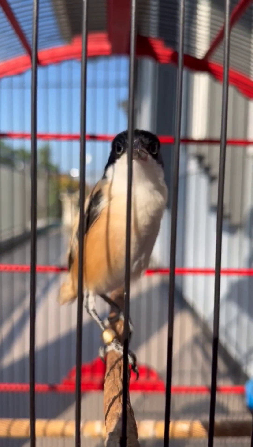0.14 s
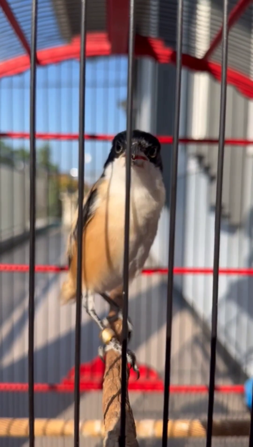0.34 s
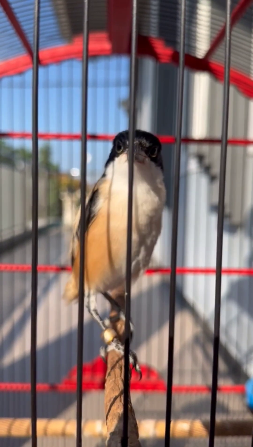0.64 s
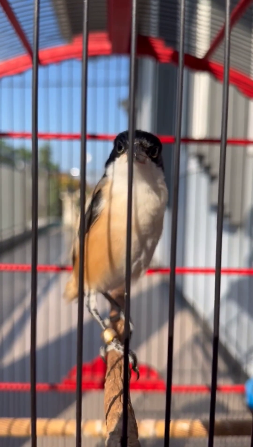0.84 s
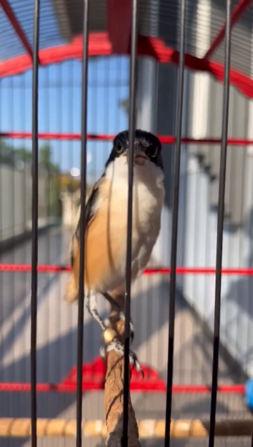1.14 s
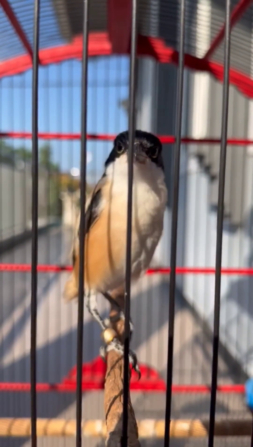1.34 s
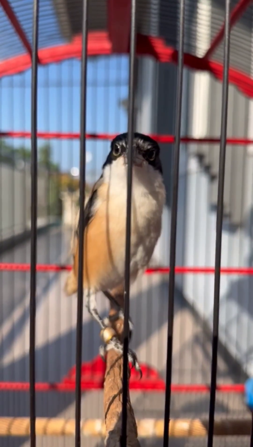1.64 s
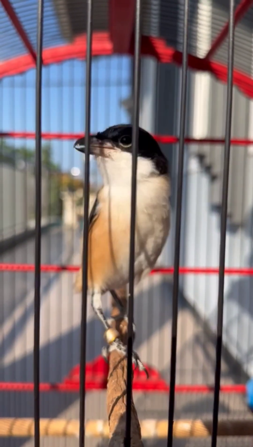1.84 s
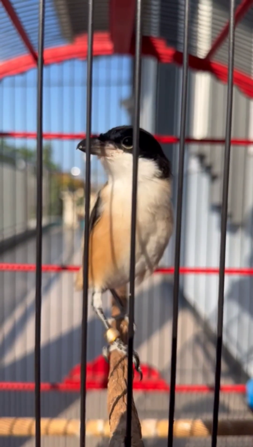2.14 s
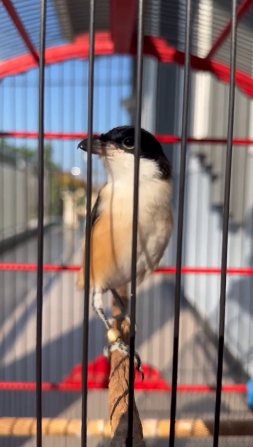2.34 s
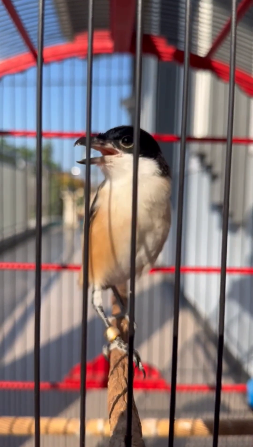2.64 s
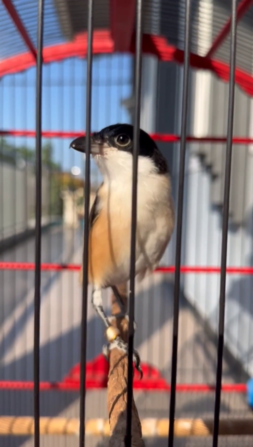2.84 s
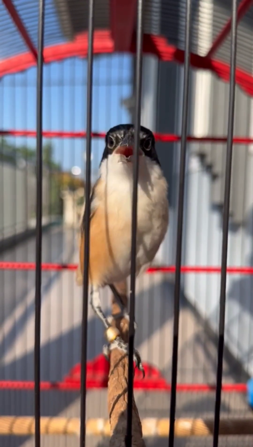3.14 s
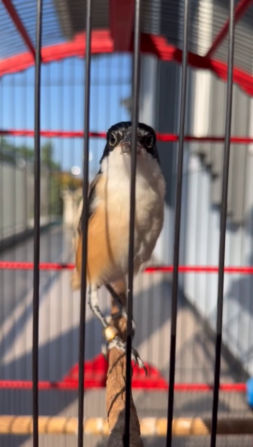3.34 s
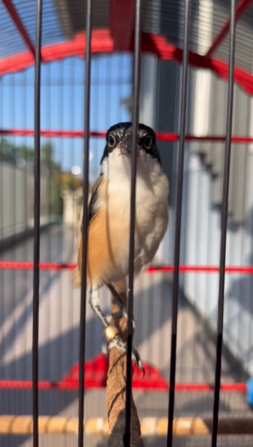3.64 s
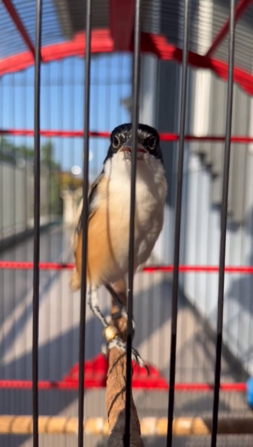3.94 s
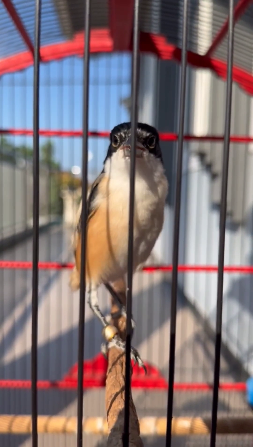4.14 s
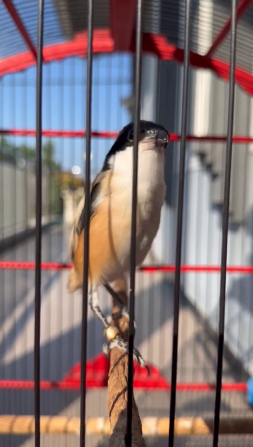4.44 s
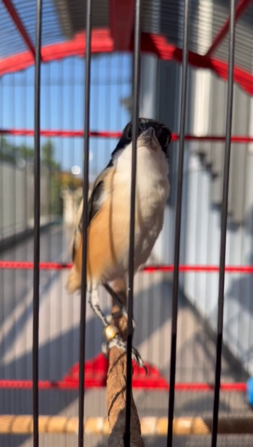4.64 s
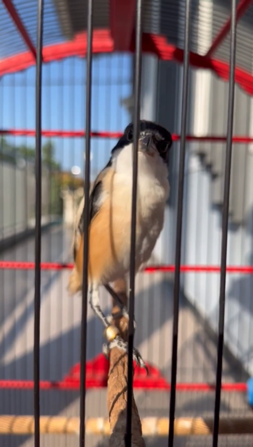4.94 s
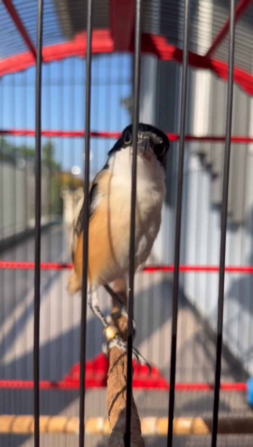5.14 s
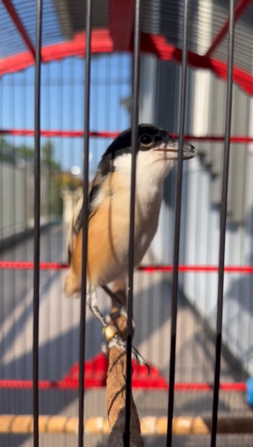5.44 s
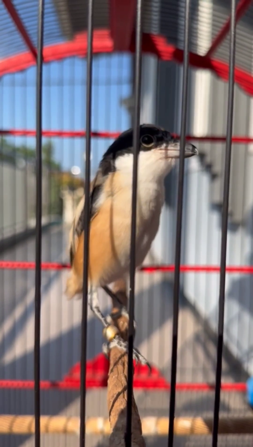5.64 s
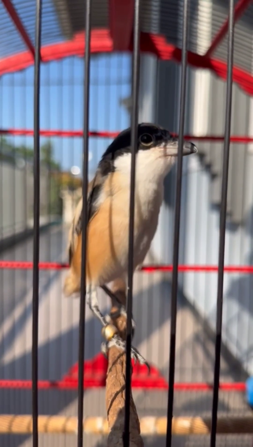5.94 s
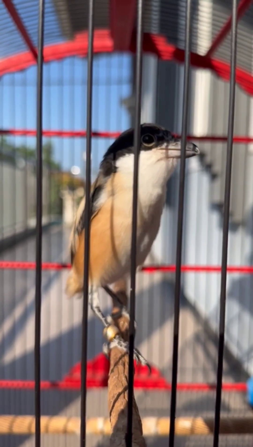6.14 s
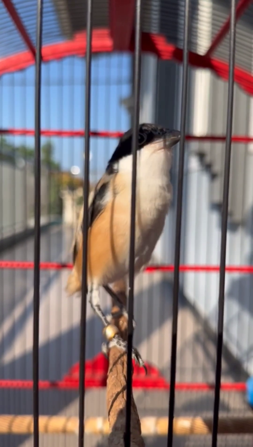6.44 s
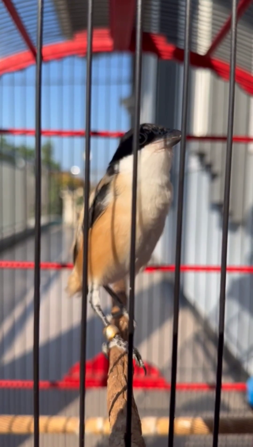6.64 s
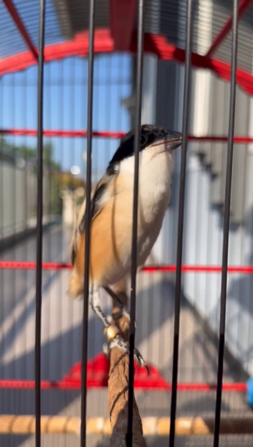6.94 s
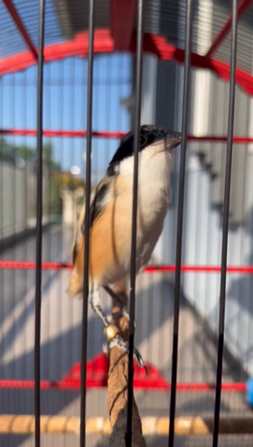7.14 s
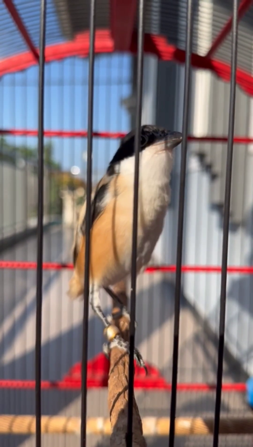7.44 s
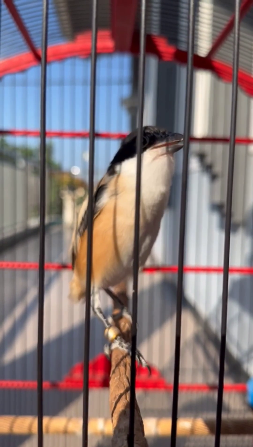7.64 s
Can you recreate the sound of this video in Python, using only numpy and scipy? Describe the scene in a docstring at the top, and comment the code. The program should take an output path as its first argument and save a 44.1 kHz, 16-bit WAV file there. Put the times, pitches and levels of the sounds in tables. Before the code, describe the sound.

Loud raspy bird chatter up close, speeding into bright chip-and-whistle notes and then rough cries, with a faint vehicle rumbling past behind.

```python
"""A fast run of chirps and rasps starts at once, close by: a caged shrike on a roofed terrace.
Both halves of its syrinx sound, one as partials and rasp through the windpipe, one as a husky whistle;
walls throw a short tail back. Behind it: a town hum of shaped noise, an engine built from its orders
going past with a wavering whine, and faint far calls and a drone of narrow noise along glides.
The sound drops out once, briefly."""
import sys
import numpy as np
from scipy import signal
from scipy.fft import rfft, irfft
from scipy.io import wavfile
from scipy.ndimage import uniform_filter1d, minimum_filter1d

SR = 44100
rng = np.random.default_rng(int(sys.argv[2]) if len(sys.argv) > 2 else 0)


def pcm_store(signal):
    """Save signal as 16-bit PCM."""
    levels = np.round(np.clip(np.atleast_2d(signal), -1, 1) * 32767)
    wavfile.write(sys.argv[1], SR, levels.astype(np.int16).T)


N = 343980
T = np.arange(N) / SR

# resonance of windpipe and beak: (f/Hz, relative level/dB)
WINDPIPE = [(900, -23), (1500, -15), (2300, -10), (2900, -11), (3500, -2), (4500, 0), (5600, -11),
            (7500, -19), (9300, -28), (11000, -58)]


def amp(db):
    """Level to amplitude ratio: 20 dB make a factor of ten."""
    return 10 ** (np.asarray(db) / 20)


def evened(x):
    """Normalization: scales a signal to rms 1."""
    return x / np.sqrt(np.mean(x ** 2) + 1e-20)


def read(points, hz):
    """Interpolation along logarithmic frequency, as on a response plot."""
    f, value = np.transpose(points)
    return np.interp(np.log(hz + 1), np.log(f + 1), value)


def add(mix, s, sound):
    """Superposition: adds a sound to the mix from s seconds on."""
    part = mix[round(s * SR):][:len(sound)]
    part += sound[:len(part)]


def drift(shape, size):
    """Low-passed noise: smooth chance of rms 1, alike over about size samples."""
    smooth = uniform_filter1d(rng.standard_normal(shape), size)
    return evened(uniform_filter1d(smooth, size))


def edges(count):
    """Gating: smooth 3 ms fades at both ends of a note keep clicks out of the spectrum."""
    return signal.windows.tukey(count, min(.006 * SR / count, 1))


def controls(rows):
    """Envelopes: sample times, rounded pitch curve, and levels as gains that swell smoothly."""
    s, hz, *levels_db = np.transpose(rows)
    t = np.arange(s[0], s[-1], 1 / SR)
    glide = uniform_filter1d(np.interp(t, s, hz), size=120, mode="nearest")
    # the cube root of the amplitude runs straight between points
    gains = [np.interp(t, s, amp(db / 3)) ** 3 for db in levels_db]
    return t, glide, *gains


def fuzzy(table):
    """Amplitude-modulated noise: narrow bands on a carrier that glides.

    Rows: (start t/s, length t/s, start f/Hz, end f/Hz, width f/Hz, level/dB)."""
    out = np.zeros(N)
    for s, length, start_hz, end_hz, width_hz, db in table:
        count = round(length * SR)
        size = max(round(SR / width_hz / 2), 1)
        phase = 2 * np.pi * np.cumsum(np.linspace(start_hz, end_hz, count)) / SR
        fuzz = drift(count, size) * np.cos(phase) + drift(count, size) * np.sin(phase)
        add(out, s, amp(db) * fuzz * signal.windows.tukey(count, .8))
    return out


def town():
    """Diffuse noise: random short-time spectra with drifting patches, partly alike in both channels."""
    # spectrum of the hum: (f/Hz, relative level/dB)
    hum_spectrum = [(22, -36), (45, -1), (82, 3), (160, -12.5), (300, -15.5), (680, -25), (1100, -29.5),
                    (2200, -35.5), (6800, -42.5), (9000, -67), (12000, -101)]
    # left-right coherence: (f/Hz, likeness from 0 to 1)
    coherence = [(60, 0.99), (150, .994), (300, 0.98), (800, 0.86), (3000, 0.96)]
    # course of the hum: (t/s, level/dB)
    hum_level = [(0.0, -43), (0.91, -45.5), (2.61, -43), (2.8, -43), (7.8, -44)]
    frames, hz = N // 256 + 5, np.fft.rfftfreq(1024, 1 / SR)
    a, b, c, d, patches = rng.standard_normal((frames, 513, 5)).T
    patches = evened(uniform_filter1d(uniform_filter1d(patches, 6, 0), 20, 1))
    same = np.clip(read(coherence, hz), -1, 1)[:, None]
    left, other = a + 1j * b, c + 1j * d
    z = np.array([left, same * left + np.sqrt(1 - same ** 2) * other])
    z *= amp(read(hum_spectrum, hz)[:, None] + 2.0 * patches)
    hum = evened(signal.istft(z, nperseg=1024, noverlap=768)[1][:, :N])
    return amp(np.interp(T, *np.transpose(hum_level))) * hum


def engine():
    """Harmonic series: multiples of the firing rate, each swelling and fading on its own."""
    # firing rate: (t/s, f/Hz, level/dB)
    firing = [(0, 24, -65), (2, 23.2, -58.5), (2.7, 23, -48), (3.4, 21.5, -46.5), (3.8, 22.4, -44),
              (4.4, 22, -52.5), (5.2, 21.2, -47), (5.8, 20, -48), (6.5, 19.5, -75), (7.8, 21, -51.5)]
    # engine orders: (multiple of the firing rate, relative level/dB)
    orders = [(1, -23.5), (2, -4.5), (3, 1.5), (4, 4), (5, -1), (6, -4.5), (7, -15), (8, -13), (9, -18),
              (10, -11)]
    t, hz, gain = controls(firing)
    phase = 2 * np.pi * np.cumsum(hz) / SR
    total = 0
    for k, db in orders:
        total = total + amp(db + 3.4 * drift(len(t), size=6000)) * np.cos(k * phase + k * k)
    out = np.zeros(N)
    add(out, 0, gain * evened(total))
    return out


def whine():
    """Frequency modulation: multiples of a wavering pitch, each under a bell-shaped swell."""
    # mean pitch of the passing vehicle's whine: (t/s, f/Hz)
    whine_pitch = [(2.45, 167.2), (2.9, 166.2), (3.1, 162.4), (3.35, 151.9), (3.6, 157.4), (3.9, 157.3),
                   (4.4, 171), (5.2, 171.4)]
    # swells: (multiple of the pitch, loudest t/s, half width t/s, level/dB)
    swells = [(2, 2.78, 0.22, -51.5), (3, 3.15, 0.44, -56), (4, 3.23, 0.4, -52.5), (4, 4.6, .5, -60.5)]
    hz = np.interp(T, *np.transpose(whine_pitch)) * (1 + 0.02 * drift(N, size=1500))
    phase = 2 * np.pi * np.cumsum(hz) / SR
    out = np.zeros(N)
    for k, s, width, db in swells:
        bell = np.exp(-((T - s) / width) ** 2)
        out += amp(db + 3.4 * drift(N, size=900)) * bell * np.cos(round(k) * phase)
    return out


def rasp(hz, phase, bright, size):
    """Chaotic flapping: partials and half partials (subharmonics), breaking up every few cycles."""
    # radiated spectrum of the rasp: (f/Hz, relative level/dB)
    rasp_spectrum = [(800, -36.5), (1400, -22.5), (2100, -20.5), (2700, -1), (3200, -11), (4300, 1.5),
                     (5600, -11), (7500, -10.5), (9300, -22.5), (11000, -61)]
    k = np.arange(2, 18)[:, None] / 2
    tilt_db = bright * np.log2(k * hz / 4000)
    half_db = -3.0 * (k % 1 > 0)  # half partials are weaker
    colour = amp(read(rasp_spectrum, k * hz) + tilt_db + half_db)
    colour /= np.sqrt(np.sum(colour ** 2, 0))
    a, b = drift((2, *colour.shape), size)
    bursts = amp(3.2 * drift(len(hz), size=55))
    return evened(bursts * np.sum(colour * (a * np.cos(k * phase) + b * np.sin(k * phase)), 0))


def second_half(rows, husk_db):
    """Nearly sinusoidal oscillation: a whistle with a weak octave, jitter and a husk of rasp."""
    t, hz, gain = controls(rows)
    phase = 2 * np.pi * np.cumsum(hz * (1 + 0.019 * drift(len(t), size=40))) / SR
    tone = np.sqrt(2) * (np.cos(phase) + amp(-18) * np.cos(2 * phase))
    tone *= amp(2.4 * drift(len(t), size=60))
    husk = amp(husk_db) * rasp(hz / 2, phase / 2, 9.7, size=16)
    return t[0], gain * (tone + husk) * edges(len(t))


def strands():
    """Resonance crossing: each strand of the second half swells as it passes one pitch."""
    # (loudest t/s, rise t/s, fall t/s, level/dB, start f/Hz, end f/Hz)
    strand_rows = [(.006, 0.0068, 0.016, -27.5, 2820, 2192), (0.55, .013, .01, -28, 2458, 2508),
                   (1.924, .04, 0.092, -24, 2665, 2248), (4.468, .013, 0.02, -17, 2216, 3091),
                   (4.617, .022, 0.024, -20, 2220, 2849), (4.763, .024, 0.029, -20.5, 1993, 2797.5),
                   (5.064, .014, 0.021, -20.5, 2210, 3145), (5.267, .025, .029, -18.5, 2146, 2603),
                   (5.506, .012, 0.036, -22.5, 2245, 3032), (5.753, .018, 0.026, -19, 2383, 3050),
                   (5.951, .028, .02, -33.5, 2487, 2528), (6.175, .015, 0.011, -27, 2440, 3041),
                   (6.235, 0.049, .04, -27.5, 2570, 2465.5), (7.026, 0.034, 0.029, -27.5, 2750, 2414),
                   (7.747, .05, 0.056, -29.5, 2778, 2597)]
    loudest_hz, start_db, end_db = 2597, -15, -20.5  # levels relative to the loudest
    out = np.zeros(N)
    for s, rise_s, fall_s, db, start_hz, end_hz in strand_rows:
        curve = [(max(s - rise_s, 0), start_hz, db + start_db), (s, loudest_hz, db),
                 (s + fall_s, end_hz, db + end_db)]
        # strands weaker than -20 dB turn huskier by 1.6 dB for each dB
        add(out, *second_half(curve, -15 + 1.6 * max(-20 - db, 0)))
    return out


def first_half(rows, bright):
    """Source and filter: a stack of partials through the windpipe, unsteady as far as it rasps."""
    t, hz, tone_gain, rasp_gain = controls(rows)
    rough = 1 / (1 + (tone_gain / rasp_gain) ** 2)
    phase = 2 * np.pi * np.cumsum(hz * (1 + .035 * rough * drift(len(t), size=30))) / SR
    k = np.arange(1, 9)[:, None]
    # the open beak lets out what lies above the resonance
    treble_db = 2 * bright * np.maximum(np.log2(k * hz / 4500), 0)
    # the rougher the voice, the more its upper partials give way to the rasp
    partials = amp(read(WINDPIPE, k * hz) + treble_db - 6.4 * rough * np.log2(k))
    partials *= amp(1.7 * np.log2(k) * drift(partials.shape, size=90))
    partials /= np.sqrt(np.sum(partials ** 2, 0) / 2)
    tone = tone_gain * np.sum(partials * np.cos(k * phase + k * k), 0)
    voice = tone + rasp_gain * rasp(hz, phase, bright, size=60)
    return t[0], voice * edges(len(t))


def calls(contour, levels, attack_s, rows):
    """Time warping: one shape, stretched over the times, pitches and levels of each call.

    Contour: (stage, place among the call's pitches from 0, pitch factor); stages are attack 0-1,
    hold 1-2, tail 2-3. Levels at these stages: (tone level/dB, rasp level/dB), added to the call's.
    Rows: (hold start t/s, hold t/s, tail t/s, tone level/dB, rasp level/dB, beak gape as
    treble tilt, pitches f/Hz ..)."""
    (stage, place, factor), (tone, rough) = np.transpose(contour), np.transpose(levels)
    out = np.zeros(N)
    for s, hold_s, tail_s, tone_db, rasp_db, gape, *pitches_hz in rows:
        t = s + np.interp(stage, np.arange(4), np.cumsum([-attack_s, attack_s, hold_s, tail_s]))
        hz = factor * np.interp(place, np.arange(len(pitches_hz)), pitches_hz)
        add(out, *first_half(np.transpose([t, hz, tone_db + tone, rasp_db + rough]), gape))
    return out


def squawks():
    """Onset of periodicity: a low scrape snaps up to a clear stack, which breaks into rasp."""
    # contour, levels and rows as in calls(); pitches at both ends of the hold
    squawk_pitch = [(0, 0, .85), (.6, 0, .72), (1, 0, 1), (2, 1, 1), (2.5, 1, .88), (3, 1, .8)]
    squawk_db = [(-26, -18), (-11.5, -6.5), (0, -15), (-4.5, -1.5), (-15.5, -0.5), (-33, -19)]
    squawk_rows = [(.037, 0.025, 0.062, -15, -18.5, -1.5, 1415, 1584),
                   (0.394, .034, .046, -17, -25, -3.5, 1654, 1766),
                   (.485, 0.027, 0.029, -16, -19, -1.5, 1502, 1561),
                   (.565, .027, .033, -14, -16.5, 2.5, 1425, 1512),
                   (7.11, 0.029, .032, -21, -21.5, 2, 1419, 1557)]
    return calls(squawk_pitch, squawk_db, .026, squawk_rows)


def steps():
    """Register jump: a level note leaps up and fades."""
    # contour, levels and rows as in calls(); pitches before and after the jump
    step_pitch = [(0, 0, .55), (.4, 0, .7), (1, 0, .985), (2, 0, 1), (2.25, 1, 1), (3, 1, .88)]
    step_db = [(-48.5, -33), (-29.5, -23.5), (1, -13.5), (2.5, -6.5), (-1.5, -5), (-34, -26)]
    step_rows = [(.755, .017, 0.021, -13.5, -10, 10, 2239, 2972),
                 (1.205, .017, 0.031, -14.5, -16, 9, 2248, 2987)]
    return calls(step_pitch, step_db, .02, step_rows)


def flicks():
    """Rapid frequency modulation: a rising note dips, flicks up through rasp and drops."""
    # contour, levels and rows as in calls(); pitches at both ends of the hold and of the flick
    flick_pitch = [(0, 0, .72), (.4, 0, .84), (1, 0, 1), (2, 1, 1), (2.17, 1, .84), (2.42, 2, 1),
                   (2.7, 1.3, .9), (3, 1, .9)]
    flick_db = [(-47.5, -35.5), (-27.5, -27.5), (-4.5, -23.5), (0.5, -12.5), (-11, -5), (-9, -6.5),
                (-22, -2.5), (-38, -15.5)]
    flick_rows = [(.975, 0.014, 0.03, -10.5, -11, 11, 2060, 2334, 3480),
                  (1.425, 0.014, 0.027, -11, -13.5, 10.7, 2087, 2312, 3700),
                  (2.217, 0.016, 0.032, -13.5, -20, 6.4, 2237, 2435, 2940),
                  (6.573, .015, .035, -14, -28.5, 6.8, 2387, 2350, 3013),
                  (7.308, .015, 0.032, -19, -23.5, 9.4, 2300, 2332, 2764)]
    return calls(flick_pitch, flick_db, .014, flick_rows)


def screeches():
    """Pitch follows air pressure: a rough arch whose tail sags for as long as the air lasts."""
    # contour, levels and rows as in calls(); pitches at both ends of the hold
    screech_pitch = [(0, 0, .66), (.4, 0, .74), (.75, 0, .95), (1, 0, 1), (1.5, .75, 1), (2, 1, 1),
                     (2.3, 1, .86), (2.85, 1, .66), (3, 1, .58)]
    screech_db = [(-29, -12.5), (-17.5, -7), (-9, -4), (-5, -4), (0, -4), (-2, -2), (-11, -1.5), (-15, -3),
                  (-27.5, -16.5)]
    screech_rows = [(1.81, .035, .188, -18, -24, -4.5, 1585, 1993),
                    (6.18, .03, .038, -26, -31, -8.5, 1523, 1923),
                    (6.268, .065, .058, -23.5, -28.5, -3, 1702, 1784),
                    (6.955, .03, .04, -21, -28, -3.5, 1605, 1897),
                    (7.037, .032, .032, -19, -27.5, -6.5, 1776, 1745),
                    (7.642, .023, .188, -21.5, -26.5, -3, 1610, 1939)]
    return calls(screech_pitch, screech_db, .023, screech_rows)


def growls():
    """Narrow-band noise: a weak, rough low glide under some screeches."""
    # rows as in fuzzy()
    growl_rows = [(1.84, 0.14, 1120, 793, 70, -49), (6.29, 0.081, 1244, 980, 70, -54),
                  (7.69, 0.097, 1156, 800, 70, -49)]
    return fuzzy(growl_rows)


def chips():
    """Breakdown of periodicity: a short level note is cut off by a burst of rasp."""
    # contour, levels and rows as in calls(); pitches at the start and at both ends of the hold
    chip_pitch = [(0, 0, 1), (1, 1, 1), (2, 2, 1), (3, 2, .83)]
    chip_db = [(-22.5, -36), (-1.5, -19), (-2, -11.5), (-14.5, -1.5)]
    chip_rows = [(2.455, .012, .006, -18.5, -1, 11.3, 2551, 2470, 2597),
                 (2.674, .011, .006, -14.5, -3.5, 8.3, 2266, 2353, 2543),
                 (2.927, .012, .005, -12.5, -6.5, 11, 2300, 2572, 2453),
                 (4.171, .010, .009, -14.5, -11, 6, 2643, 2586, 2366)]
    return calls(chip_pitch, chip_db, .009, chip_rows)


def whistles():
    """Frequency glide: after each chip and dive, a swoop up, quick swell, longer fall and hook down."""
    # (loudest t/s, fall t/s, level/dB, husk relative level/dB, start f/Hz, loudest f/Hz, end f/Hz)
    whistle_rows = [(2.48, .015, -16.5, -5.5, 4530, 3900, 3960),
                    (2.698, .019, -16.5, -3.5, 3960, 4010, 3950),
                    (2.951, 0.017, -10, -15.5, 4170, 4430, 4190),
                    (3.205, .016, -12.5, -13.5, 4905, 4706, 4750),
                    (3.347, 0.016, -11, -17, 4960, 4690, 4510),
                    (3.494, .017, -9.5, -18.5, 4236, 4315, 4000),
                    (3.647, 0.014, -11.5, -18.5, 4110, 3986, 4080),
                    (3.843, 0.016, -9.5, -19.5, 4467, 4462, 4180),
                    (4.003, .009, -9, -15.5, 4530, 4360, 4310), (4.197, .02, -10.5, -17, 4770, 4480, 4130)]
    swoop_s, rise_s, hook_s = .004, .008, .009
    swoop_hz, hook_factor = 2420, .78
    swoop_db, start_db, end_db, hook_db = -20.5, -8.5, -23, -42  # relative to the loudest
    out = np.zeros(N)
    for s, fall_s, db, husk_db, start_hz, loudest_hz, end_hz in whistle_rows:
        start, end = s - rise_s, s + fall_s
        curve = [(start - swoop_s, swoop_hz, db + swoop_db), (start, start_hz, db + start_db),
                 (s, loudest_hz, db), (end, end_hz, db + end_db),
                 (end + hook_s, hook_factor * end_hz, db + hook_db)]
        add(out, *second_half(curve, husk_db))
    return out


def dives():
    """Downward chirp: a short note sweeps steeply down."""
    # contour, levels and rows as in calls(); pitches at the start, both ends of the hold and the end
    dive_pitch = [(0, 0, 1), (.5, .55, 1), (1, 1, 1), (1.5, 1.55, 1), (2, 2, 1), (3, 3, 1)]
    dive_db = [(-39, -32), (-16, -18), (-2, -11.5), (-1, -8.5), (-1.5, -2), (-8.5, -1)]
    dive_rows = [(3.181, .011, .005, -10.5, -16.5, 11.5, 4220, 3100, 2507, 2140),
                 (3.328, 0.0053, .005, -11.5, -16.5, 11.3, 3973, 3000, 2530, 2150),
                 (3.474, .010, 0.0055, -15, -20.5, 7.5, 3950, 3000, 2635, 2600),
                 (3.627, .008, 0.0065, -18, -25.5, 3.4, 3524, 2900, 2280, 1930),
                 (3.82, .011, .007, -14.5, -26, 3.6, 3824, 2830, 2377, 2140),
                 (3.983, .007, .007, -17, -19, 9, 3596, 2800, 2485, 1920)]
    return calls(dive_pitch, dive_db, .011, dive_rows)


def far_calls():
    """Narrow-band noise: faint far calls as fuzzy whistles."""
    # rows as in fuzzy()
    far_rows = [(3.823, 0.18, 1326, 1204, 40, -62.5), (4.321, 0.036, 1314, 1300, 49.8, -57),
                (6.63, .25, 2800, 2840, 150, -61.5), (6.849, 0.14, 3820, 3880, 400, -56.5),
                (7.33, 0.24, 3180, 3240, 180, -56.5), (7.517, 0.13, 6120, 5830, 1790, -55.5)]
    return fuzzy(far_rows)


def drone():
    """Narrow-band noise: a low drone sinks in pitch as the vehicle draws away."""
    # rows as in fuzzy()
    drone_rows = [(4.3, 1.5, 270, 230.4, 109, -58)]
    return fuzzy(drone_rows)


def cries():
    """Arched frequency sweep: a note swells to its top and falls off."""
    # contour, levels and rows as in calls(); pitches at both ends of the hold and at the end
    cry_pitch = [(0, 0, .66), (1, 0, 1), (1.5, .7, 1), (2, 1, 1), (2.5, 1.25, 1), (3, 2, 1)]
    cry_db = [(-45.5, -25.5), (-10.5, -11), (-3.5, -8), (-1, 1.5), (-14.5, -3), (-33, -28)]
    cry_rows = [(4.435, 0.024, 0.042, -16, -23, -2, 1937, 2174, 1038),
                (4.581, 0.026, 0.029, -16.5, -21.5, -1.5, 1868, 2095, 1400),
                (4.728, 0.022, 0.032, -14, -21, -2.5, 1780, 2135, 1600),
                (5.03, 0.032, .033, -17.5, -20, -1, 2025, 2173, 1661),
                (5.232, .025, 0.037, -17.5, -22.5, -2.5, 2008, 2178, 1550),
                (5.48, .025, .033, -16, -20, 4, 1958, 2129, 1786),
                (5.716, .019, 0.051, -15.5, -23.5, -2.5, 1923, 2044, 2050),
                (5.9, .027, .038, -17, -23, 2.5, 1734, 1857, 1600)]
    return calls(cry_pitch, cry_db, .022, cry_rows)


def crossed_tones(first, second):
    """Intermodulation: halves on one air stream shake each other into sum and difference tones."""
    windpipe_db = read(WINDPIPE, np.fft.rfftfreq(N, 1 / SR))
    return irfft(rfft(first * second) * amp(7.0 + windpipe_db), N)


def ports(x):
    """Interchannel phase: the two microphone ports hear the treble with a phase gap."""
    # (f/Hz, phase by which left leads/rad)
    port_lead = [(3000, 0), (5000, -.2), (7150, -1), (8500, -2.1), (9600, -3)]
    lead = read(port_lead, np.fft.rfftfreq(N, 1 / SR)) / 2
    return irfft(rfft(x) * np.exp(1j * np.array([lead, -lead])), N)


def terrace(x):
    """Reverberation: a few near echoes off bars and wall, then sparse taps that decay by band."""
    # (f/Hz, time to decay by 60 dB t/s)
    decay = [(1500, 0.22), (4000, 0.22), (8000, 0.21)]
    taps = np.zeros((2, SR // 2))
    at = np.arange(300, SR // 2 - 20, 20) + rng.integers(0, 20, (2, (SR // 2 - 301) // 20))
    np.put_along_axis(taps, at, rng.choice([-1., 1.], at.shape), 1)
    hz, t, z = signal.stft(taps, SR, nperseg=256)
    tail = signal.istft(z * amp(-60 * t / read(decay, hz)[:, None]), SR, nperseg=256)[1]
    tail *= amp(-18.5) / np.linalg.norm(tail[0])
    # echo delays in samples, slightly apart between left and right
    near = rng.integers(20, 260, 4) + rng.integers(0, 12, (2, 4))
    np.put_along_axis(tail, near, amp(-12.5) * rng.choice([-1., 1.], (1, 4)), 1)
    return signal.fftconvolve(x[None], tail, axes=1)[:, :N]


def scene():
    """Superposition: direct and reflected bird over the sounds of the surroundings."""
    first = squawks() + steps() + flicks() + screeches() + growls() + chips() + dives() + cries()
    second = strands() + whistles()
    bird = first + second + crossed_tones(first, second)
    surroundings = town() + engine() + whine() + far_calls() + drone()
    return ports(bird) + terrace(bird) + surroundings


def record(dry):
    """Transmission chain: the microphone's bass cut, a peak limiter, a brief silence, a band limit."""
    # silence: (from t/s, to t/s)
    dropout = (1.071, 1.116)
    edge_hz, ceiling = 12500, .85
    dry = signal.sosfilt(signal.butter(4, 36., "high", fs=SR, output="sos"), dry)
    room = minimum_filter1d(ceiling / np.maximum(abs(dry).max(0), ceiling), 129)
    dry = dry * uniform_filter1d(room, 129)
    running = uniform_filter1d(1. * ((T < dropout[0]) | (T > dropout[1])), 150)
    band = signal.firwin(511, edge_hz, window=("kaiser", 9), fs=SR)
    return signal.oaconvolve(dry * running, band[None], "same")


dry = scene()
out = record(dry)
pcm_store(out)
```